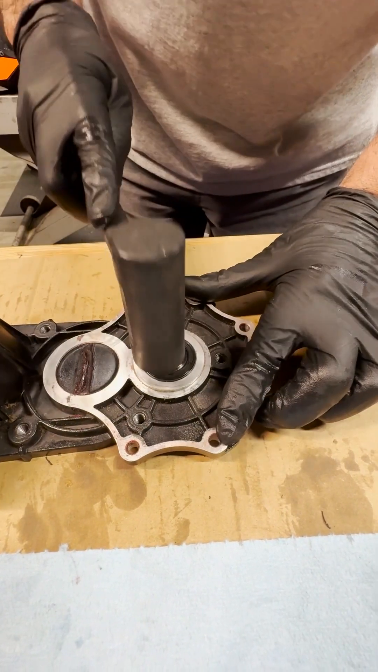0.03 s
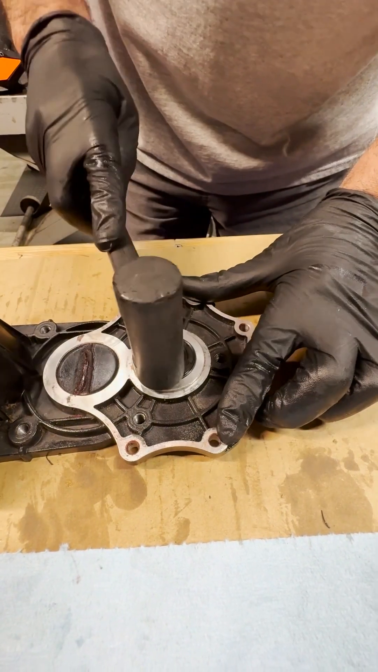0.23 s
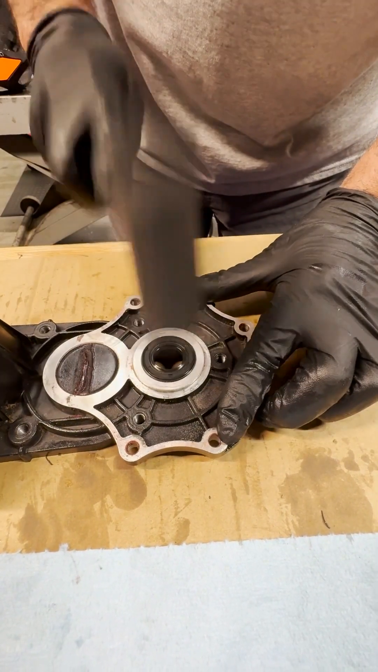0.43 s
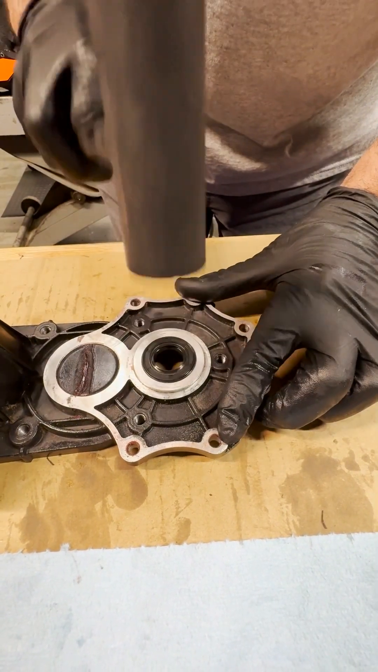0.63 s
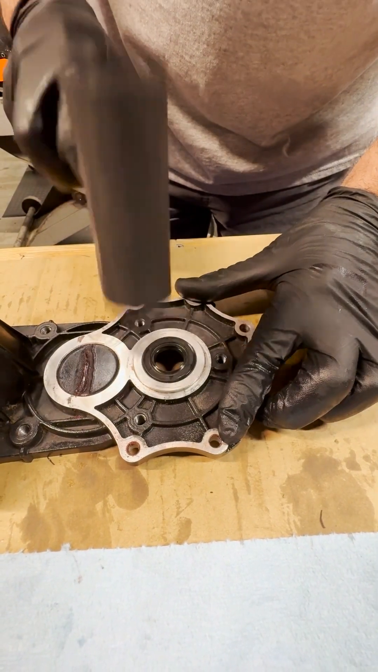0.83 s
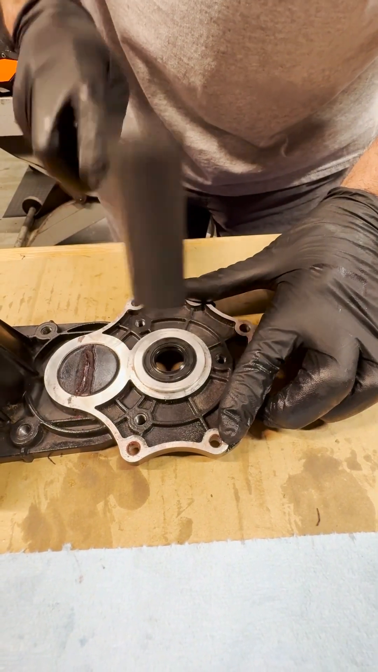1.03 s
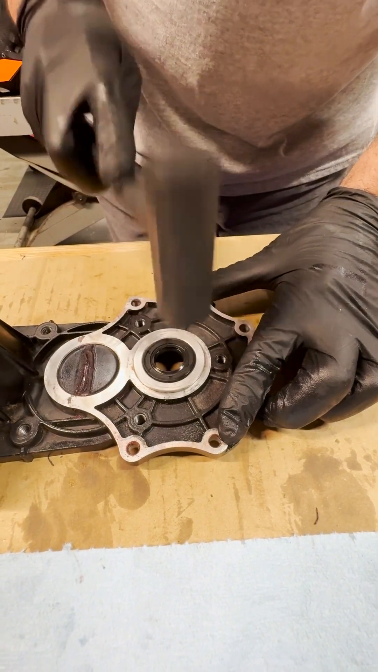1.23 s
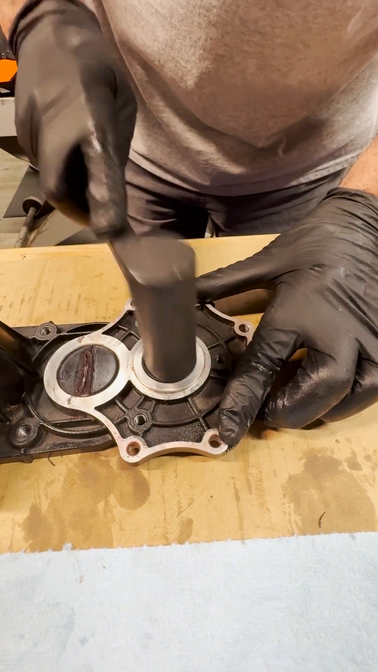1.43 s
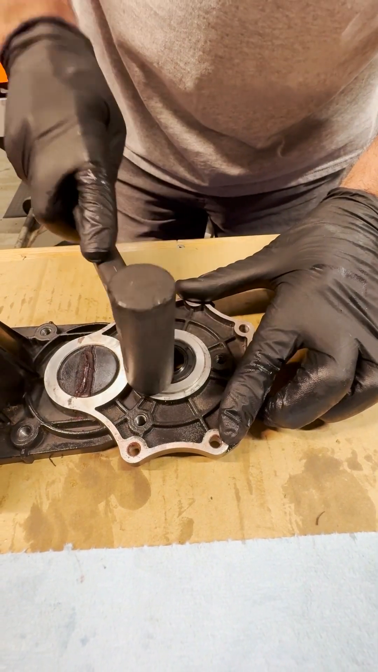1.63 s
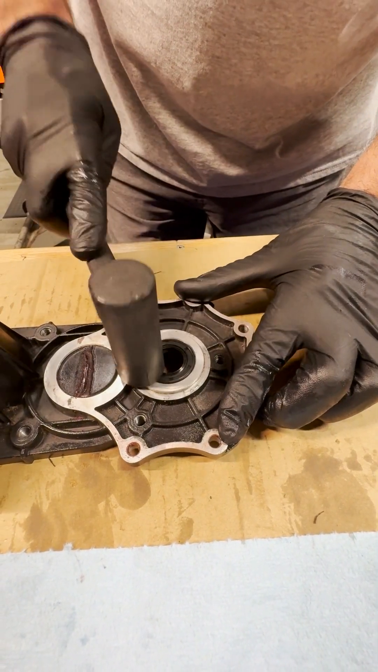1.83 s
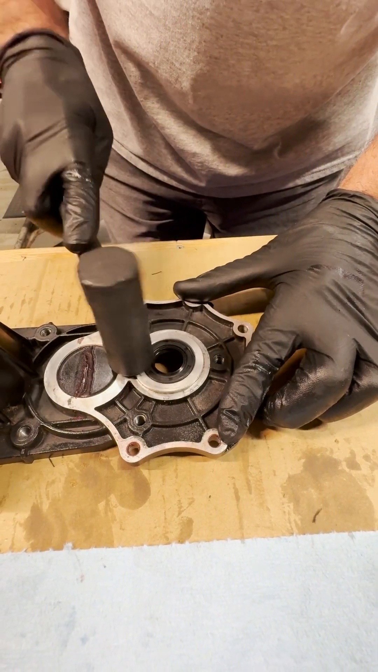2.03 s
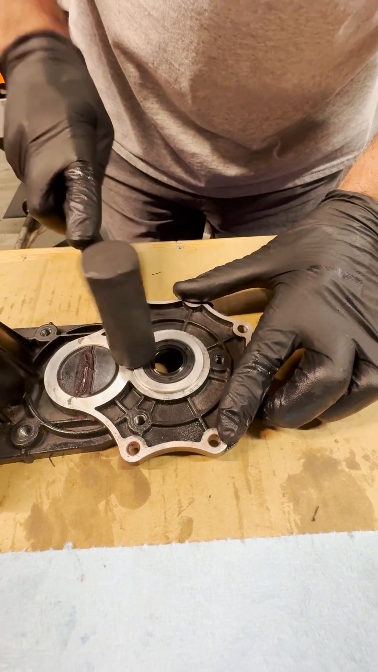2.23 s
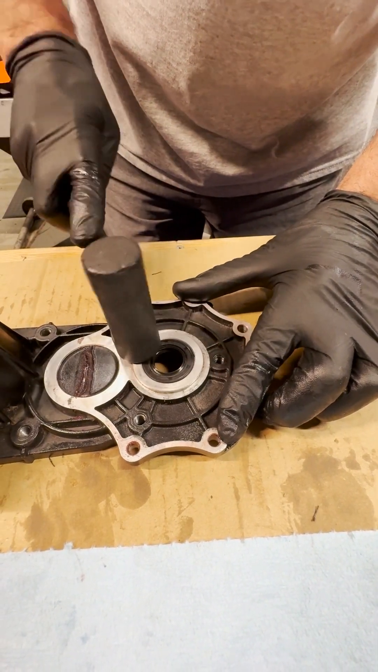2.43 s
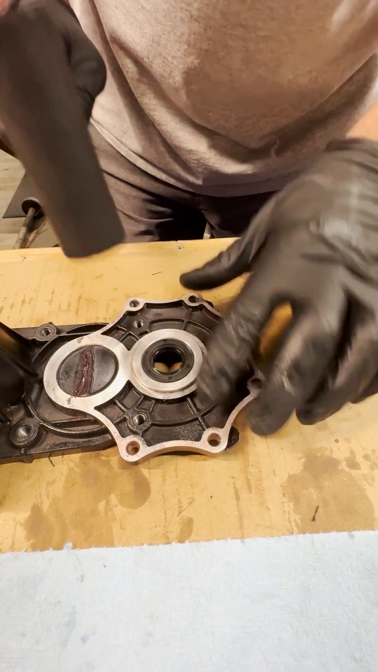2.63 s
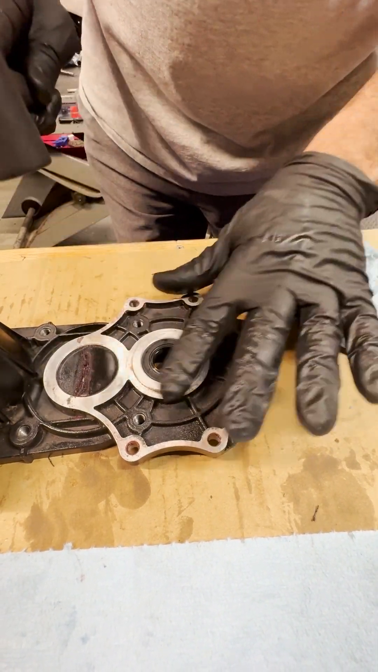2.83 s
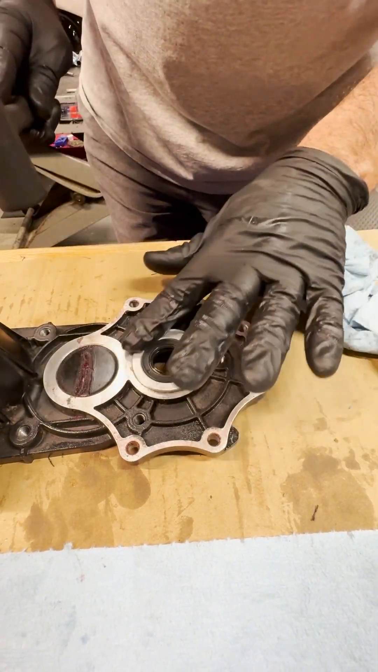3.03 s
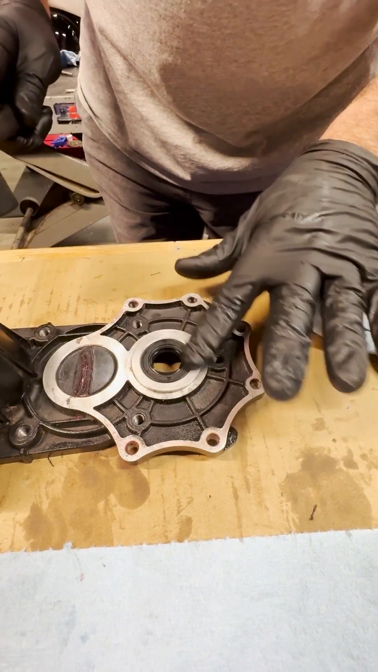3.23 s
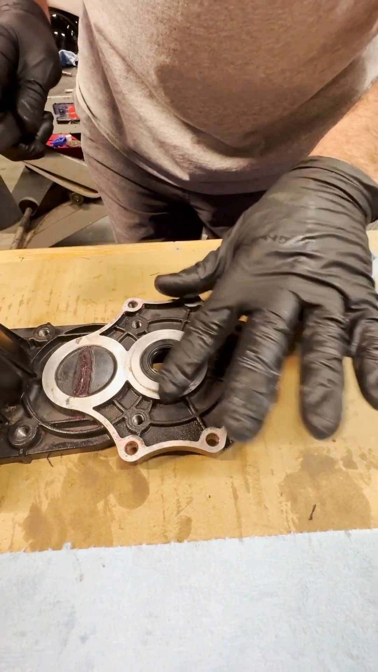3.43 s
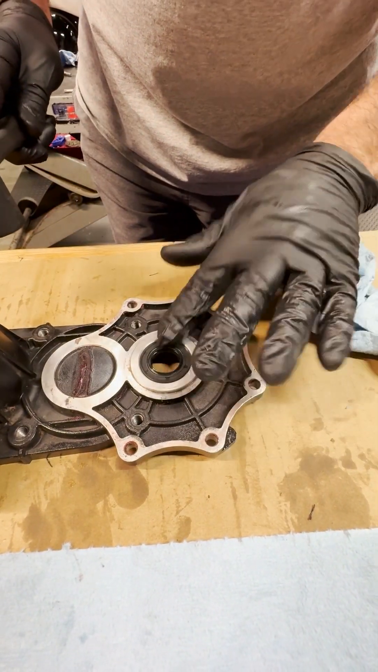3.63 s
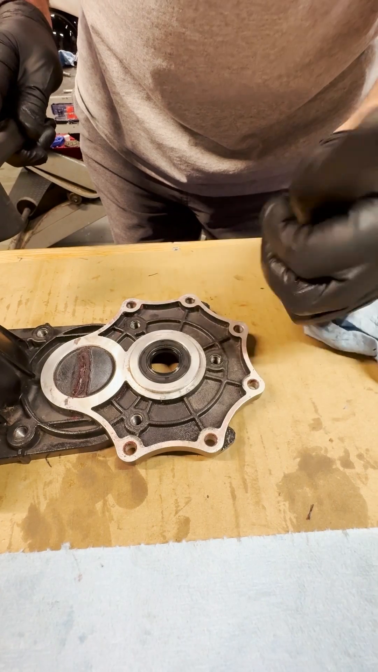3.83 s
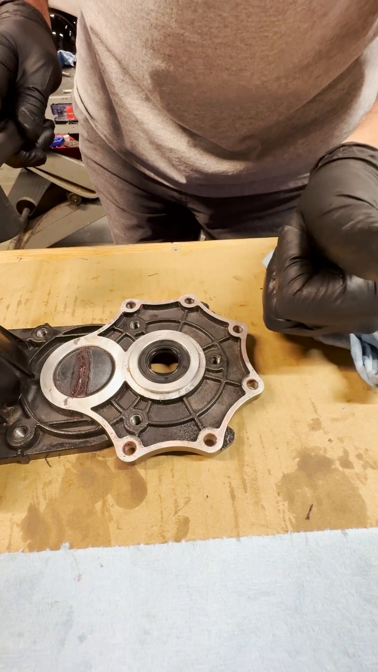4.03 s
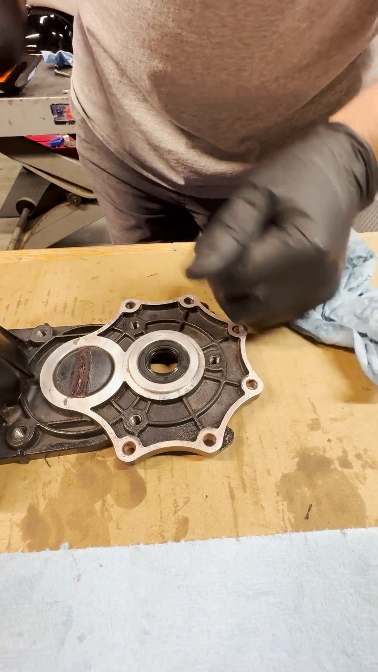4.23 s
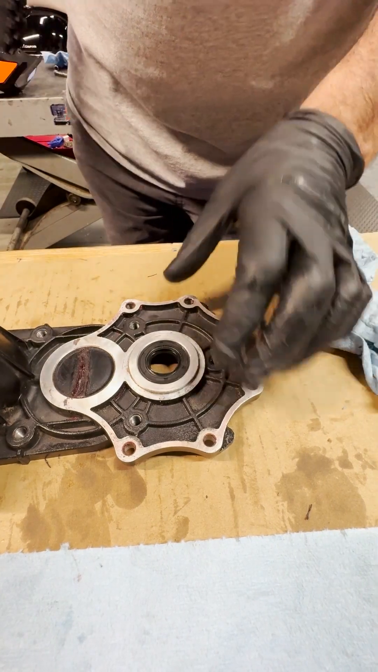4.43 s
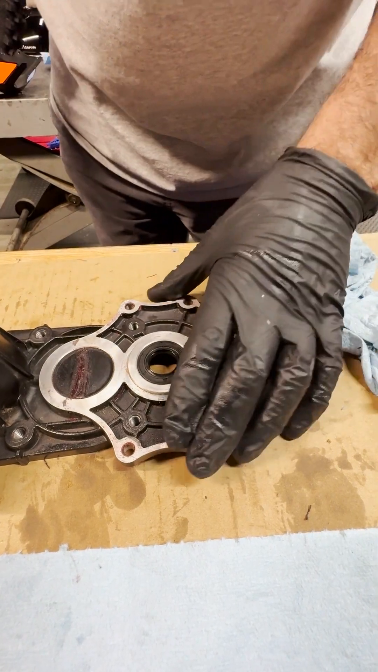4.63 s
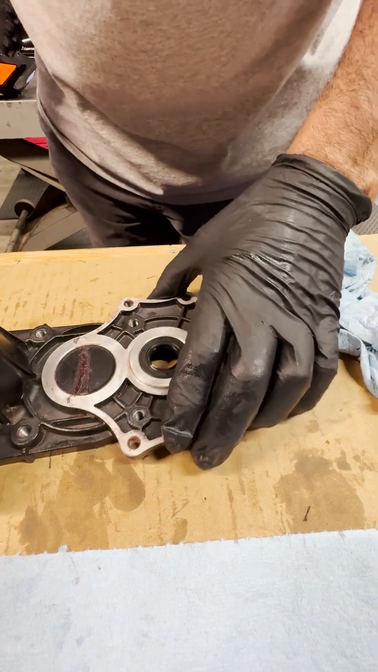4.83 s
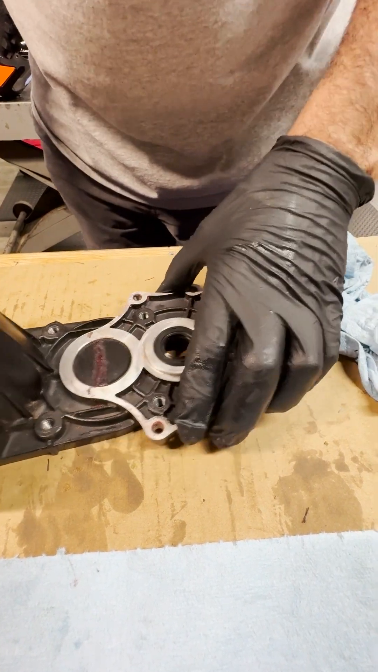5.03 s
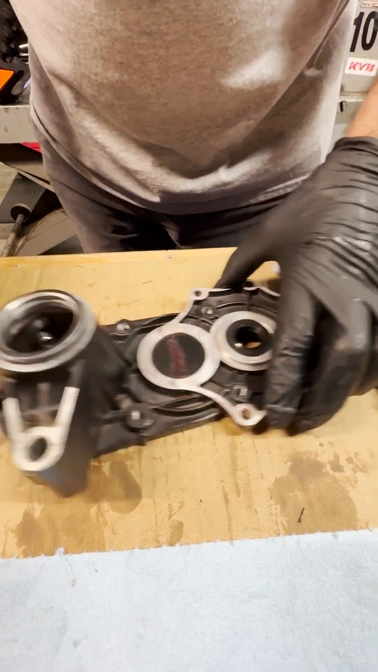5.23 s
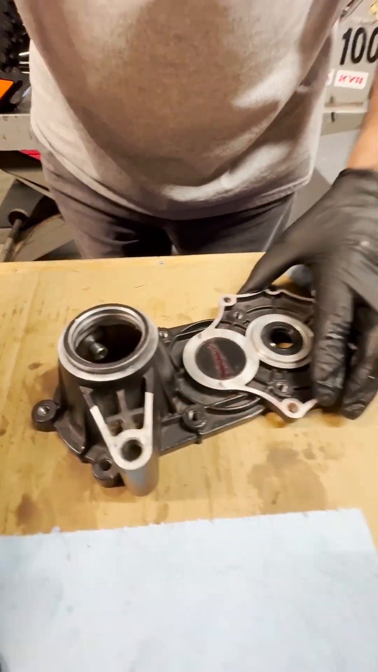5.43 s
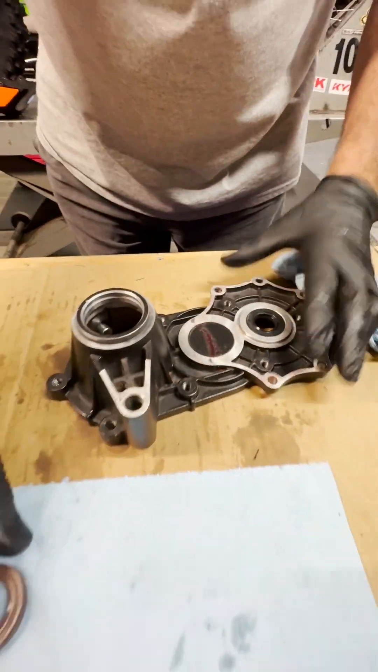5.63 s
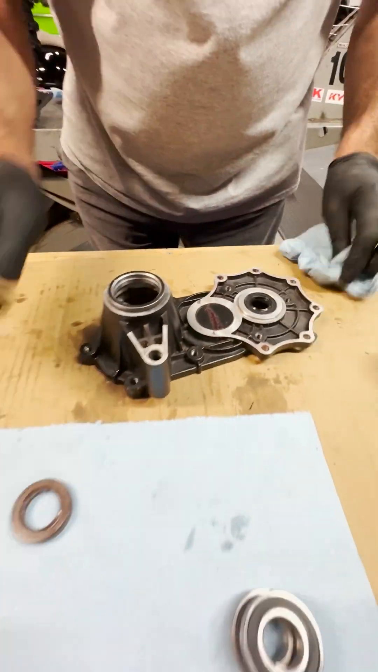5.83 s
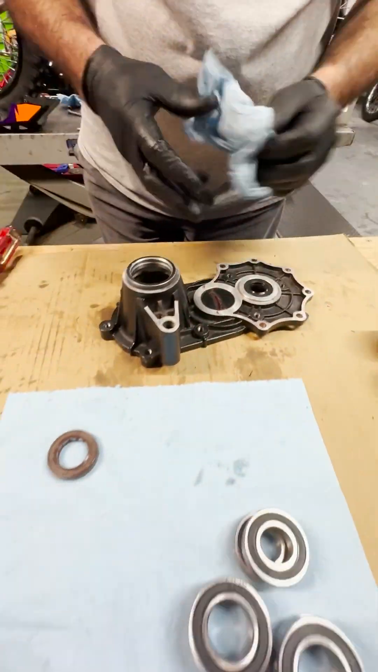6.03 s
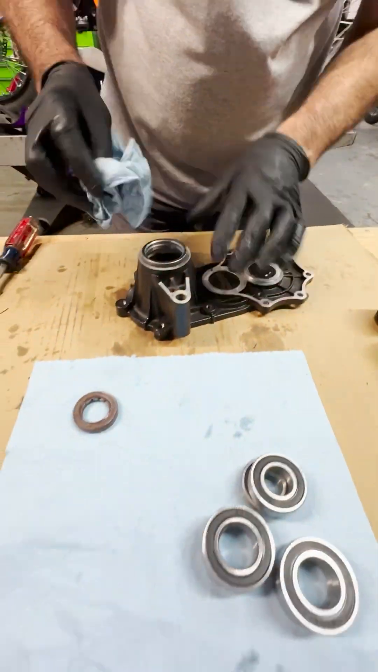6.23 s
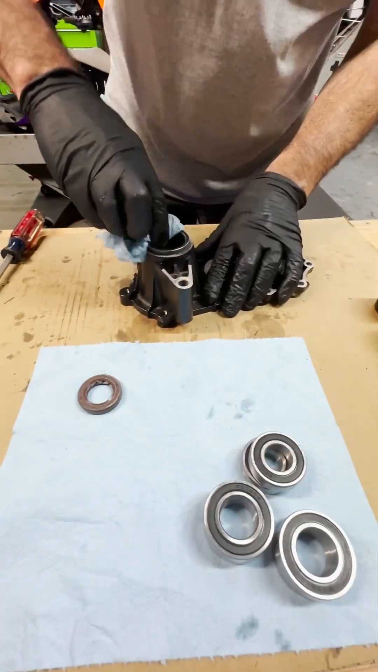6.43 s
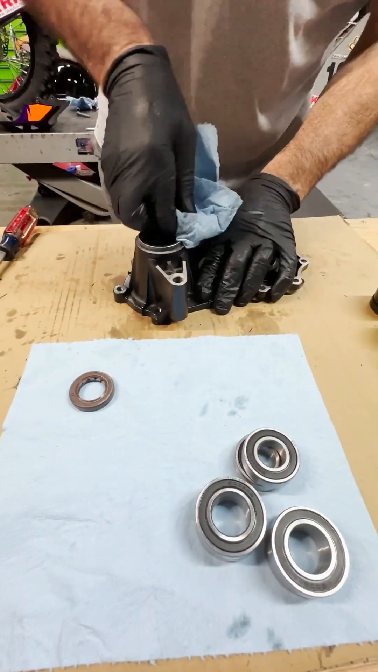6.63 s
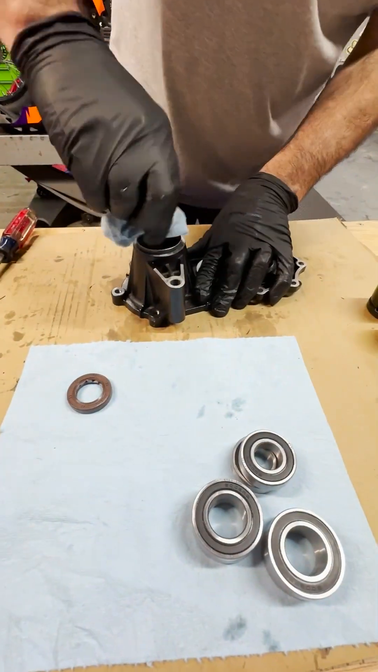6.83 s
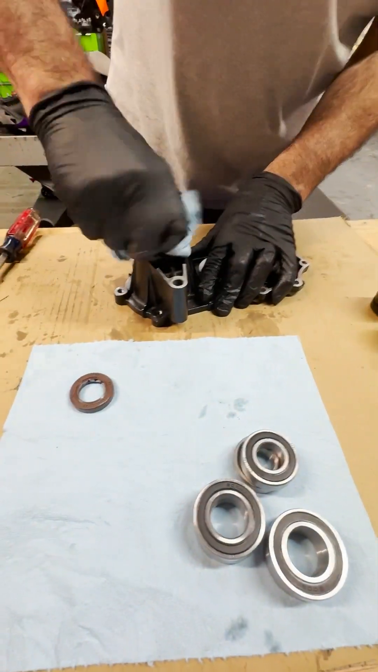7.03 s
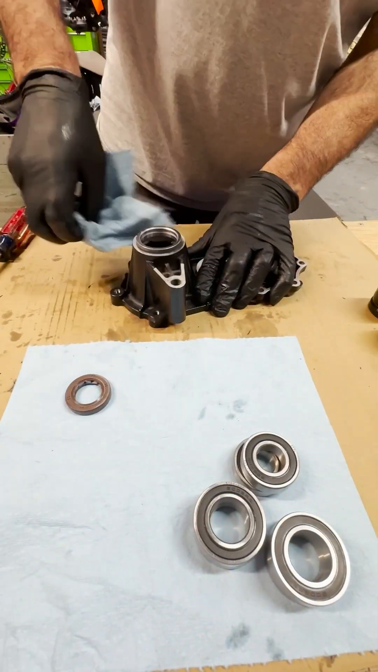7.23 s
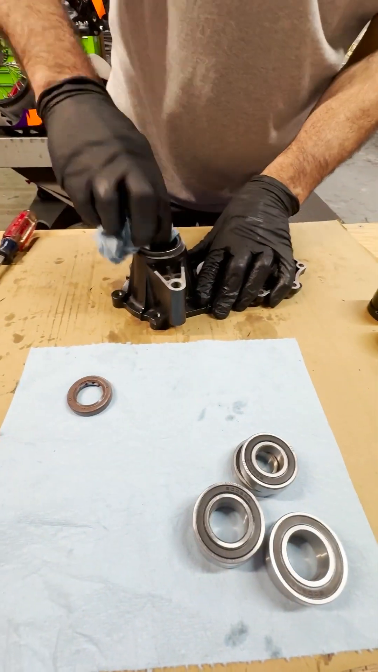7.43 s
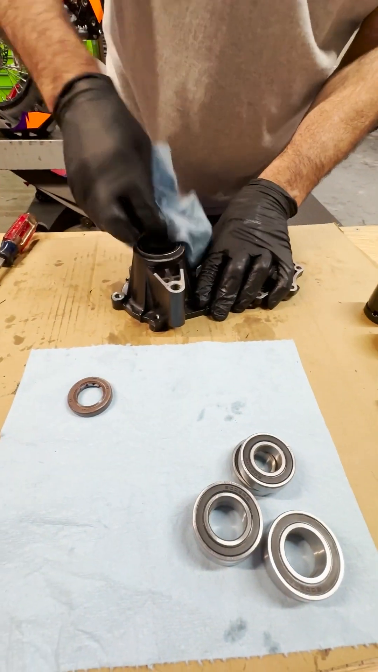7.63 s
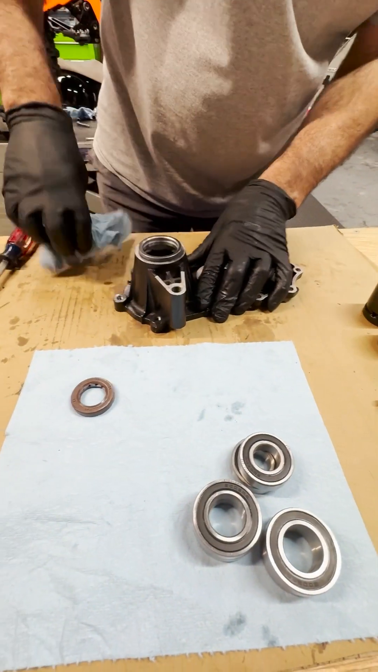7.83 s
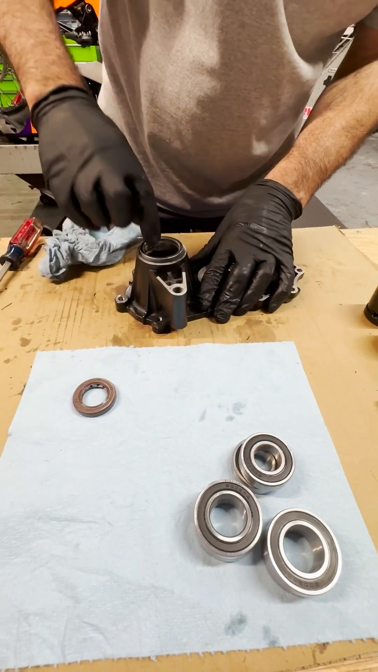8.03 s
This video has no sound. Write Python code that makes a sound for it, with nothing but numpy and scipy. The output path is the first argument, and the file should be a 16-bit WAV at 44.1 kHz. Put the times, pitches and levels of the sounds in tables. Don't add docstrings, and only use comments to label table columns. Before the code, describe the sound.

Very close stereo sound at a wooden workshop bench. From 0.25 to 2.45 s a soft mallet strikes a seal into a cast gearbox cover eleven times, about every 0.2 s. Each blow is a heavy, low bench thump around 120 Hz with a millisecond-short ring of the cover, a dry crack of varying sharpness, and a brief shudder of bench, loose steel and walls. Some blows bounce doubly. After 2.6 s it drops to near silence, with faint glove brushes and ticks until 4.4 s. Around 4.5 s come soft knocks and a small tool clink; from 4.7 to 5.4 s the case slides with gritty scrapes, firmer dull knocks near 5.0 and 5.1 s. From 5.9 s a paper cloth rustles, then wipes the bore in short, hollow-toned strokes, with light knocks near 7.1, 7.7 and 8.1 s. Soft low room rumble lies underneath.

```python
import sys
import numpy as np
from scipy import signal
from scipy.fft import rfft, irfft, next_fast_len
from scipy.io import wavfile
from scipy.ndimage import map_coordinates

SR = 44100
rng = np.random.default_rng(int(sys.argv[2]) if len(sys.argv) > 2 else 0)


def volts_from_db(level):
    exponent = np.asarray(level, float) / 20
    return 10 ** exponent


def to_wav(s):
    ch = np.atleast_2d(s).T
    pcm = np.round(np.clip(ch, -1, 1) * 32767)
    wavfile.write(sys.argv[1], SR, pcm.astype(np.int16))


N = 357210
SCENE_T = np.arange(N) / SR
T = np.arange(SR // 2) / SR
LEFT_LATE = 24.6
WALL_S = .016

# start in seconds, level in dB,
# brightness in dB per octave, decay factor, rattle level in dB.
BLOW_TAILS = [(.251, -7, -5, 0.8, -55), (0.444, -10, 1, 1.7, -43.5), (.673, -8.5, 0.27, 1.35, -49),
              (.898, -5.5, 1, 0.99, -49.5), (1.113, -7, 0, 1.13, -48), (1.332, -8.5, 0.5, 1.06, -42),
              (1.61, -4.5, 0.5, 0.93, -44.5), (1.824, -7, 0.36, .9, -52.5), (2.044, -9, 1.5, 0.87, -50),
              (2.23, -8.5, 1.01, 0.99, -44), (2.433, -7.5, 1.5, 0.97, -45.5)]
# frequency in Hz, likeness from 0 to 1.
LIKENESS = [(60, 1), (130, 0.44), (290, 0.91), (640, 0), (15000, 0.72)]


def unit(x):
    return x / np.sqrt(np.mean(x ** 2) + 1e-20)


def along(points, hz):
    f, v = np.transpose(points)
    return np.interp(np.log(hz + 1), np.log(f + 1), v)


def curve(points):
    s, value = np.transpose(points)
    return np.interp(SCENE_T, s, value)


def wobble(rate):
    knots = rng.standard_normal(int(N * rate / SR) + 4)
    return map_coordinates(knots, [np.arange(N) * rate / SR])


def filtered(x, response):
    m = next_fast_len(x.shape[-1] + 8192)
    spectrum = rfft(x, m) * response(np.fft.rfftfreq(m, 1 / SR))
    return irfft(spectrum, m)[..., :x.shape[-1]]


def peaks(modes):
    def response(f):
        total = 0
        for k, (center, width, db) in enumerate(modes):
            damping = 1j * f * width
            total = total + (-1) ** k * volts_from_db(db) * damping / (center * center - f * f + damping)
        return total
    return response


def shape(spectrum):
    return lambda hz: volts_from_db(along(spectrum, hz))


def likeness_angle(hz):
    return np.arccos(np.clip(along(LIKENESS, hz), -1, 1)) / 2


def rush(response):
    def split(hz):
        angle = likeness_angle(hz)
        return response(hz) * np.array([np.cos(angle), np.sin(angle)])
    mid, side = filtered(rng.standard_normal((2, N)), split)
    return unit(np.array([mid + side, mid - side]))


def ring(hz, t60, rise, late=0):
    t = np.maximum(T - late, 0)
    return np.sin(2 * np.pi * hz * t) * volts_from_db(-60 * t / t60) * (1 - np.exp(-t / rise))


def add(out, s, sound, pan_db=0):
    part = out[:, round(s * SR):][:, :sound.shape[-1]]
    part += (sound * volts_from_db([[pan_db / 2], [-pan_db / 2]]))[:, :part.shape[1]]


def mallet():
    # start in seconds, peak level in dB,
    # pitch in Hz after the peak, time to the peak in seconds, pitch in Hz before it.
    bench_thumps = [(.2514, -4.5, 120, .0072, 215), (.4353, -9, 240, .006, 230),
                    (.4471, -10, 120, .005, 210), (.6703, -5.5, 135, .006, 230),
                    (.6798, -14, 125, .004, 200), (.8946, -4.5, 120, .0105, 230),
                    (1.1093, -8, 130, .006, 230), (1.1188, -8, 120, .004, 190),
                    (1.3273, -7, 115, .0115, 240), (1.6063, -11, 150, .005, 250),
                    (1.6138, -11, 140, .004, 230), (1.6208, -6, 130, .0045, 170),
                    (1.8217, -9, 140, .0055, 260), (1.8302, -7, 130, .004, 185),
                    (2.0413, -4.5, 122, .009, 185), (2.2281, -8, 120, .008, 265),
                    (2.4285, -7, 118, .012, 235)]
    # start in seconds, peak level in dB, pitch in Hz, length in seconds,
    # left over right in dB.
    cover_songs = [(0.251, -22, 687, 0.008, 11), (0.444, -10.5, 602, 0.0038, 11),
                   (0.671, -23.5, 580, 0.0039, 1), (0.686, -37, 610, 0.0083, -2),
                   (.898, -14, 700, 0.0025, 10), (1.111, -22.5, 586, 0.0043, -12),
                   (1.332, -5.5, 707, 0.0046, -2.5), (1.606, -16, 588, 0.01, -4.5),
                   (1.613, -14, 601, 0.003, -5.5), (1.822, -15.5, 591, 0.0054, 0),
                   (2.0435, -16, 712, 0.0046, 7), (2.23, -7, 693, 0.0043, 5), (2.433, -4, 685, 0.0034, 5)]
    # start in seconds, peak level in dB, rib level in dB,
    # middle crack level in dB, decay time t60 in seconds.
    seal_cracks = [(.2498, -25, -3.5, -6, 0.025), (.4435, -11, -11, -6.5, 0.0056),
                   (.6748, -27.5, -11, -10, 0.0025), (.897, -10, -11.5, -8.5, .005),
                   (1.1146, -19.5, -17, -19, 0.0034), (1.3305, -12.5, -16.5, -8.5, 0.0039),
                   (1.6055, -41.5, 8, -5, 0.058), (1.6135, -44, 9.5, -3, .03), (1.8225, -40.5, 10, 1, .03),
                   (2.0431, -22.5, -4, -3.5, 0.0038), (2.2283, -27, 6, 0.5, 0.015),
                   (2.4324, -22.5, 2, 2.5, 0.011)]
    touch_levels = [-43, -20, -26.5, -41, -27.5, -41.5, -35, -60, -36.5, -39, -38.5, -46.5]
    out = np.zeros((2, N))
    for s, db, hz, peak, early_hz in bench_thumps:
        swell = max(.2 + 0.98 * (early_hz / hz - 1), .05)
        add(out, s, thump(db, hz, peak, early_hz, swell))
    for s, *controls in cover_songs:
        add(out, s, sing(*controls))
    for s, *controls in BLOW_TAILS:
        add(out, s, shudder(*controls))
    for (s, *controls), touch_db in zip(seal_cracks, touch_levels):
        add(out, s - .015, touch(touch_db))
        add(out, s, crack(*controls))
    return out


def thump(db, hz, peak, early_hz, swell):
    # frequency in Hz, level in dB, decay time t60 in seconds.
    bench_modes = [(139.6, -22, 0.33), (106, -25.5, 0.074), (80, -25.5, 0.2), (422, -23, 0.16)]
    # frequency in Hz, level in dB, decay time t60 in
    # seconds, lead before the peak in seconds (never earlier than the contact).
    bend_hz, bend_db, bend_t60, lead = (340, -8.5, 0.0046, 0.04)
    after = np.maximum(T - peak, 0)
    env = np.clip(T / peak, 0, 1) ** swell * volts_from_db(-60 * after / 0.04)
    turns = hz * after - early_hz * np.maximum(peak - T, 0)
    push = np.cos(2 * np.pi * turns) + 0.12 * np.cos(4 * np.pi * turns)
    push = push + 0.15 * np.sin(2 * np.pi * 70 * T)
    free = 0
    for mode_hz, level, t60 in bench_modes:
        free = free + volts_from_db(level) * ring(mode_hz, t60, rise=0.024, late=peak - 0.13 / mode_hz)
    free = free - volts_from_db(bend_db) * ring(bend_hz, bend_t60, rise=0.00054, late=max(peak - lead, 0))
    left_db = -1.5 - 16 * np.clip(1.2 - T / peak, 0, 1)
    left, right = volts_from_db(db) * (env * push + free) * volts_from_db([left_db, 3 + 0 * T])
    return np.array([np.roll(left, round(LEFT_LATE)), right])


def sing(db, hz, length, pan_db):
    t = np.maximum(T - np.array([[0], [.0001]]), 0)
    env = (1 - np.exp(-t / 0.00058)) * volts_from_db(-60 * np.maximum(t - length, 0) / 0.0036)
    turns = hz * t - 0.5 * np.exp(-t / 0.00049)
    tone = np.sin(2 * np.pi * (turns + 0.23))
    return volts_from_db(db + 3.0) * env * tone * volts_from_db([[pan_db / 2], [-pan_db / 2]])


def touch(db):
    t = T[:round(.015 * SR)]
    dull = peaks([(700, 280, -3.5), (2460, 640, -21.5)])
    noise = filtered(rng.standard_normal((2, len(t))), dull)
    return volts_from_db(db - 2300 * (t[-1] - t)) * unit(noise)


def crack(db, rib_db, mid_db, t60):
    # frequency in Hz, width in Hz, level in dB.
    crack_top = [(8700, 700, -9), (11300, 1300, -3), (14000, 1000, -6)]
    crack_mid = [(3730, 1300, 1), (5440, 150, 3.5), (6500, 2600, -6.5)]
    # frequency in Hz, level in dB, decay time t60 in seconds.
    casting_modes = [(3070, -6, .012), (5390, -8, .012), (8430, -12, .014), (4050, -6, .008),
                     (6100, -13, .01)]
    # frequency in Hz, decay time t60 in seconds.
    rib_mode = (2210, 0.018)
    snap_and_creep = volts_from_db(-60 * T / t60) + volts_from_db(-14 - 60 * T / 0.012)
    burst = rng.standard_normal((2, len(T))) * snap_and_creep * (1 - np.exp(-T / 0.0002))
    top = filtered(burst[0], peaks(crack_top))
    mid = filtered(burst[1], peaks(crack_mid))
    top, mid = top / np.abs(top).max(), mid / np.abs(mid).max()
    modes = 0
    for hz, level, life in casting_modes:
        modes = modes + volts_from_db(level + rng.normal(0, 3)) * ring(hz, life, rise=.0006)
    rib = volts_from_db(rib_db + 2) * ring(*rib_mode, rise=0.00009, late=0.0012)
    both = volts_from_db(db) * (top + volts_from_db(mid_db) * (mid + modes))
    both = both + volts_from_db(-25) * np.roll(both, round(WALL_S * SR))
    late = filtered(both, lambda f: np.exp(-2j * np.pi * f * LEFT_LATE / SR))
    return np.array([late - volts_from_db(db - 2.0) * rib, both + volts_from_db(db + 2.5) * rib])


def shudder(db, bright_db, stretch, buzz_db):
    # frequency in Hz, level in dB per Hz.
    tail_tone = [(21, -33.5), (35, -2), (234, -0.5), (361, -8), (753, -7), (922, -16.5), (1460, -23),
                 (1970, -32), (3110, -34), (4120, -44), (6330, -50), (7010, -49), (8160, -55), (13900, -70),
                 (15000, -64)]
    # frequency in Hz, level in dB.
    echo_tone = [(150, -16), (1500, -13), (3300, -9.5), (5500, -8.5), (12000, -19)]
    # frequency in Hz, width in Hz, level in dB.
    loose_steel = [(6910, 80, 4), (7670, 60, -4), (5070, 110, -3), (3300, 250, 3), (8890, 60, -9)]

    def near(hz):
        return along(tail_tone, hz) + bright_db * np.log2(1 + hz / 500)

    def far(hz):
        return near(hz) + along(echo_tone, hz)

    tail = dying(near, stretch) + dying(far, 2.2 * stretch)
    tail = tail / tail[:, :SR // 20].std()
    buzz = filtered(rng.standard_normal((2, len(T))), lambda f: peaks(loose_steel)(f) ** 2)
    buzz = unit(buzz) * np.clip((T - .012) / .01, 0, 1) * volts_from_db(buzz_db - 60 * T / .13)
    return volts_from_db(db - 16.0) * tail * volts_from_db([[-2.5], [2.5]]) + buzz


def dying(tone_db, stretch=1):
    # frequency in Hz, decay time t60 in seconds.
    shop_decay = [(60, 0.59), (140, 0.074), (300, 0.23), (500, 0.093), (800, 0.084), (1500, 0.17),
                  (3300, 0.16), (6000, .15), (12000, 0.2)]
    hz, t, z = signal.stft(rng.standard_normal((2, SR // 2)), SR, nperseg=512)
    angle = likeness_angle(hz)[:, None]
    mid, side = z[0] * np.cos(angle), z[1] * np.sin(angle)
    pair = np.array([mid + side, mid - side])
    hz = hz[:, None]
    t60 = stretch * along(shop_decay, hz)
    gain = volts_from_db(tone_db(hz) - 60 * t / t60) / np.sqrt(t60 * SR / 14)
    gain = gain * (1 - np.exp(-(t / .014) ** 2) / (1 + (hz / 380) ** 4))
    gain = gain * (1 - np.exp(-(t / WALL_S) ** 4) / (1 + (2500 / (hz + 1)) ** 4))
    gain = gain * volts_from_db(3.2 * rng.standard_normal(gain.shape))
    noise = signal.istft(pair * gain, SR, nperseg=512)[1][:, :len(T)]
    return noise * np.clip((T - .004) / 0.0033, 0, 1)


def handling():
    # start in seconds, peak level in dB, pitch in Hz, decay time t60 in seconds, edge level in dB.
    case_knocks = [(4.476, -49, 127, 0.089, -38), (4.505, -44, 153, 0.049, -25),
                   (4.694, -49.5, 80.3, .11, -27.5), (4.724, -40, 86, 0.038, -45),
                   (4.956, -24, 150, 0.051, -17.5), (5.064, -24.5, 131, 0.051, -31.5),
                   (5.098, -30.5, 124.6, 0.07, -31), (6.44, -49.5, 124, 0.0783, -38),
                   (7.127, -34.5, 129, 0.036, -24.5), (7.67, -34.5, 136, 0.079, -23),
                   (8.086, -41.5, 146.4, 0.15, -22.5)]
    # start in seconds, peak level in dB, pitch in Hz, left over right in dB.
    glove_ticks = [(2.686, -59, 11300, 9), (3.32, -54.5, 5603, 4), (3.452, -58, 5500, 0),
                   (3.914, -52, 6000, -2), (4.15, -65, 5000, 0), (4.259, -59.5, 11630, 0),
                   (4.481, -61.5, 2300, 4), (4.492, -66, 5500, 0.5), (4.955, -42, 1100, -4),
                   (5.066, -43, 2866, 16), (5.092, -38.5, 1978, -9), (5.399, -40, 10830, -4),
                   (5.829, -44.5, 9000, -12), (6.664, -56.5, 11130, -1.5), (7.124, -55, 806, 3.5),
                   (7.145, -57, 762, 0), (7.691, -63, 779.4, -1)]
    # start in seconds, peak level in dB, left over right in dB.
    tool_clinks = [
        (4.547, -39, -6),
        (4.566, -54, 10),
    ]
    # frequency in Hz, level in dB, decay time t60 in seconds.
    tool_modes = [(650, 9.5, 0.017), (1160, 26.5, 0.0051), (1330, -9.5, 0.39), (1615, -2.5, 0.13),
                  (1902, 3, 0.017), (2783, -8, 0.076), (3068, -18, 0.13)]
    out = np.zeros((2, N))
    for s, db, hz, t60, edge_db in case_knocks:
        edge = ring(384, 0.014, rise=0.0055) + 0.077 * ring(690, 0.021, rise=0.00036)
        body = ring(hz, t60, rise=0.004)
        knock = volts_from_db(db + 5.5) * (body + volts_from_db(edge_db + 18.5) * edge)[None]
        add(out, s, knock + shop(knock), -5.5)
    for s, db, hz, pan_db in glove_ticks:
        burst = rng.standard_normal((1, len(T))) * volts_from_db(-60 * T / 0.0133)
        snap = filtered(burst, lambda f: peaks([(hz, 1.9 * hz, 0)])(f) ** 2)
        add(out, s, volts_from_db(db + 0.97) * snap / np.abs(snap).max(), pan_db)
    for s, db, pan_db in tool_clinks:
        tones = sum(volts_from_db(level) * ring(hz, t60, rise=0.0012) for hz, level, t60 in tool_modes)
        clink = volts_from_db(db - 13.0) * tones[None]
        add(out, s, clink + shop(clink), pan_db)
    return out


def shop(x):
    # frequency in Hz, level in dB.
    shop_tone = [(40, -13), (140, -10), (300, 2), (1500, -8), (12000, -13)]
    tail = dying(lambda hz: along(shop_tone, hz))
    return signal.fftconvolve(x.mean(0)[None, :SR // 10], tail, axes=1)[:, :len(T)]


def rubbing():
    # start in seconds,
    # length in seconds, level in dB, swell over the stroke in dB.
    glove_rows = [(0, 0.13, -78, -10), (.31, .003, -70, 0), (.394, .003, -72, 0), (.41, 0.012, -64, -4),
                  (1.09, .004, -76, 0), (1.06, 0.004, -70, 0), (2.605, 0.0067, -58.5, -4.5),
                  (2.66, 0.11, -76, -4.5), (2.81, 0.16, -78, -1.5), (3.1, 0.16, -86, 4.5),
                  (3.27, 0.048, -81, 4), (3.35, .07, -80, -6), (3.445, 0.08, -69.5, -3),
                  (3.68, 0.076, -75, 3), (3.78, 0.062, -76, -7), (3.912, 0.0043, -64.5, -0.5),
                  (4.19, 0.143, -85, 11), (4.34, .13, -81, -6), (5.49, 0.12, -64.5, -13.5),
                  (5.672, 0.01, -68, -2.5), (5.73, 0.012, -73, 1), (5.83, 0.01, -59.5, 7.5),
                  (5.89, 0.036, -79.5, -12)]
    # start in seconds, length in seconds, level in dB,
    # swell in dB, bore over hiss in dB.
    slide_rows = [
        (4.703, 0.0093, -79.5, 5, -4.5),
        (4.764, 0.11, -67.5, 4, -15.5),
        (4.9, .05, -74, 0, -12),
        (4.972, 0.076, -66, 3, -14),
        (5.068, 0.216, -58, 5, -10.5),
        (5.297, 0.089, -52.5, -3, -15),
    ]
    wipe_rows = [(5.941, 0.094, -73.5, -8, -20), (6.078, 0.048, -69.5, 1.5, -19.5),
                 (6.162, .14, -81.5, -4, -6), (6.359, 0.11, -80, 8, -2.5), (6.528, 0.09, -69, 3, -4.5),
                 (6.736, 0.13, -69, -3.5, -0.5), (6.892, 0.14, -76.5, -1.5, 0),
                 (7.066, 0.027, -63, -5.5, -6.5), (7.128, 0.064, -62.5, -16.5, 4),
                 (7.256, .02, -73, 1, -20), (7.45, 0.07, -77, 0, 7), (7.529, 0.12, -70.5, 1, -1.5),
                 (7.674, 0.014, -65.5, 1.5, 0), (7.839, 0.063, -68, -3, -7.5),
                 (7.924, 0.046, -77, -9, -17.5), (8.09, 0.019, -82.5, 0.5, 8)]
    # start in seconds, length in seconds, level in dB, swell in dB.
    brush_rows = [
        (2.615, 0.027, -67, -12),
        (3.33, 0.027, -83, -3.5),
    ]
    # frequency in Hz, level in dB per Hz.
    hiss_tone = [(2900, -30.5), (5000, -13), (7200, -3.5), (8300, 0), (11500, 0), (14200, -2.5),
                 (15600, -2.5), (15900, -45)]
    body_tone = [(650, -40.5), (1100, -9.5), (1750, -5), (2040, -1), (2850, -1), (3600, -0.5), (7000, -4.5),
                 (9100, -32), (15400, -120)]
    hiss, body, bore = rush(shape(hiss_tone)), rush(shape(body_tone)), hollow()
    grain = volts_from_db(1.6 * wobble(60) + 1.6 * wobble(250) + 2.2 * wobble(900))
    glove = strokes(glove_rows)
    slide = strokes([row[:4] for row in slide_rows])
    wipe = strokes([row[:4] for row in wipe_rows])
    bore_rows = [(s, length, db + bore_db, swell_db)
                 for s, length, db, swell_db, bore_db in list(slide_rows) + list(wipe_rows)]
    near_bore = strokes(bore_rows + list(brush_rows))
    bright = (glove + slide + wipe) * volts_from_db([[-1.5], [1.5]])
    dull = volts_from_db(-7.5) * glove + volts_from_db(-2.5) * slide + volts_from_db(-1.5) * wipe
    deep = (volts_from_db(-20.5) * glove + near_bore) * volts_from_db(2.5 * wobble(30))
    return grain * (bright * hiss + dull * body + deep * bore)


def strokes(rows):
    grip, let_go = 553.5, 481
    t = np.arange(0, N / SR + .01, .002)
    s, length, db, swell_db = np.transpose(rows)[:, :, None]
    level_db = db + swell_db * np.clip((t - s) / length, 0, 1)
    level_db = level_db - grip * np.maximum(s - t, 0) - let_go * np.maximum(t - s - length, 0)
    return np.interp(SCENE_T, t, np.sqrt(np.sum(volts_from_db(level_db) ** 2, axis=0)))


def hollow():
    # time in seconds, pitch in Hz.
    bore_pitch = [
        (3.5, 741),
        (4.7, 558.3),
        (5.3, 588),
        (5.37, 700),
        (6.81, 718),
        (6.879, 604),
        (7.05, 702),
        (7.2, 680),
        (7.46, 604),
        (7.598, 710),
    ]
    # frequency in Hz, width in Hz.
    bore_modes = [(500, 82), (610, 120), (770, 89)]
    stops = [c - 25 * k for k, (c, w) in enumerate(bore_modes)]
    place = np.interp(curve(bore_pitch), stops, range(len(bore_modes)))
    narrow = 0
    for k, (c, w) in enumerate(bore_modes):
        share = np.sqrt(np.clip(1 - np.abs(place - k), 0, 1))
        narrow = narrow + share * rush(lambda f: peaks([(c, w, 0)])(f) ** 2)
    return narrow + volts_from_db(-3) * rush(lambda f: peaks([(600, 900, 0)])(f) ** 2)


def workshop():
    # time in seconds, level in dB.
    rumble_level = [(0, -51.5), (.6, -40), (1.1, -52.5), (1.7, -59.5), (2.75, -64), (3.3, -67.5),
                    (4.2, -67.5), (4.7, -64), (5.16, -55), (5.55, -62.5), (6.5, -60.5), (7, -57),
                    (7.4, -61), (7.8, -55.5), (8.1, -60.5)]
    drone_level = [(0, -46.5), (.25, -55.5), (.9, -54.5), (1.3, -74.5), (3, -83.5), (8.1, -99)]
    air_lift = [(0, 15.5), (.5, 21), (1, 20), (1.6, -1), (2.6, 1.5), (4, 2), (5.5, 9), (8.1, 11)]
    # frequency in Hz, level in dB per Hz.
    rumble_tone = [(12, -56), (20, -21), (65, -6), (97, -4.5), (114, -7.5), (200, -16.5), (220, -24),
                   (280, -26), (316, -32), (500, -39.5), (650, -66.5), (1100, -120)]
    air_tone = [(260, -40), (450, -11), (1240, -14), (2040, -10), (2500, -12), (3000, -19.5), (12000, -31),
                (14500, -50), (15800, -90), (22000, -120)]
    # frequency in Hz, width in Hz, level in dB.
    drone_band = [(180, 40, 0)]
    since = SCENE_T - np.transpose(BLOW_TAILS)[0][:, None]
    shaken = np.sum((since > 0) * volts_from_db(-40.5 - 60 * np.abs(since) / 0.28), axis=0)
    rumble_gain = volts_from_db(curve(rumble_level) + 0.58 * wobble(14.0)) + shaken
    rumble = rumble_gain * rush(shape(rumble_tone)) * volts_from_db([[-.8], [.8]])
    drone = volts_from_db(curve(drone_level)) * rush(lambda f: peaks(drone_band)(f) ** 3)
    air = volts_from_db(-88 + curve(air_lift) + 2.2 * wobble(8)) * rush(shape(air_tone))
    return rumble + drone + air


def scene():
    return mallet() + handling() + rubbing() + workshop()


def top_cut(x):
    return signal.sosfilt(signal.butter(12, 16880, fs=SR, output="sos"), x)


def record(dry):
    # notch in Hz, width in Hz, depth from 0 to 1, top in Hz, bottom in
    # Hz.
    notch_hz, width, depth, top_hz, low_hz = (12650, 800, .6, 15800, 38)
    lag = np.array([[0], [8.8]])
    x = filtered(dry, lambda f: np.exp(-2j * np.pi * f * lag / SR))

    def port(f):
        band = 1j * f / (low_hz + 1j * f) / (1 + (f / top_hz) ** 30)
        return (1 - depth * peaks([(notch_hz, width, 0)])(f)) * band

    x = filtered(x, port)
    x = x / (1 + np.abs(x / .89) ** 8) ** (1 / 8)
    return top_cut(x)


dry = scene()
out = record(dry)
to_wav(out)
```